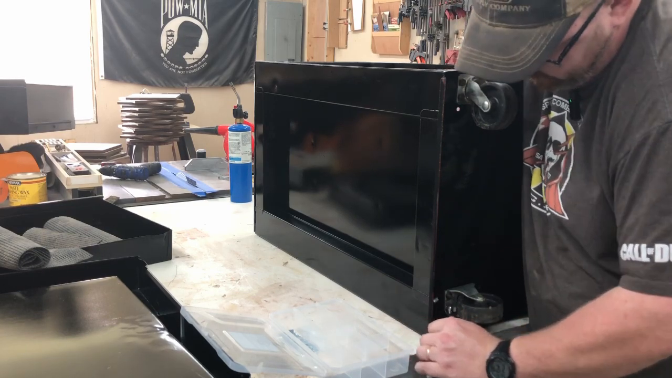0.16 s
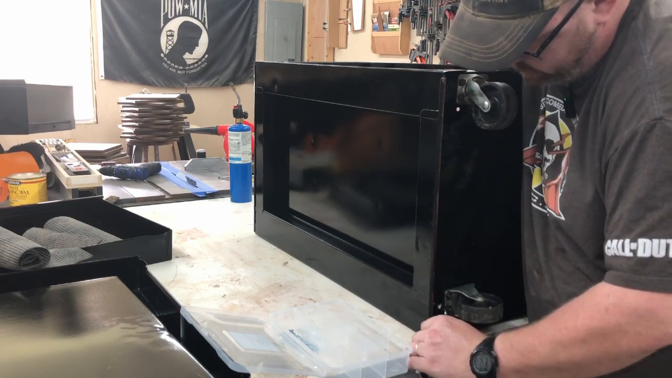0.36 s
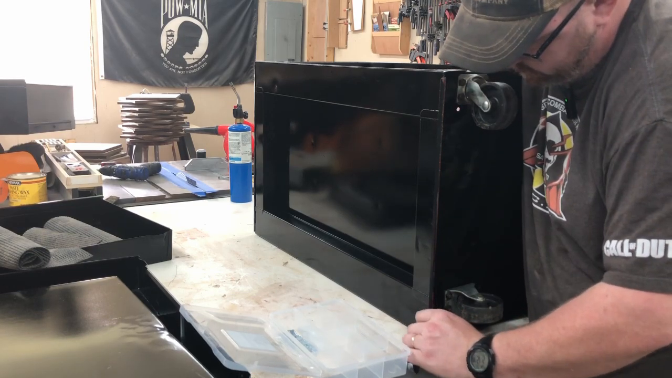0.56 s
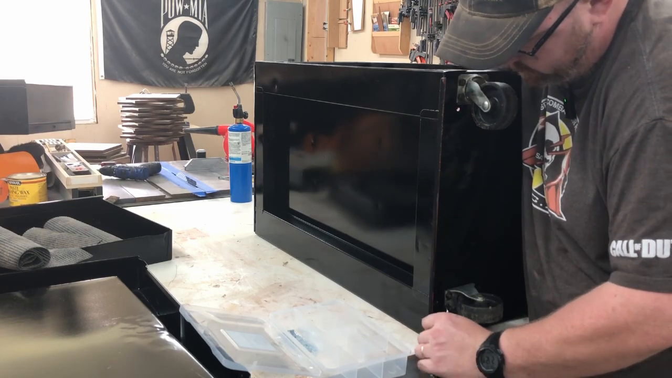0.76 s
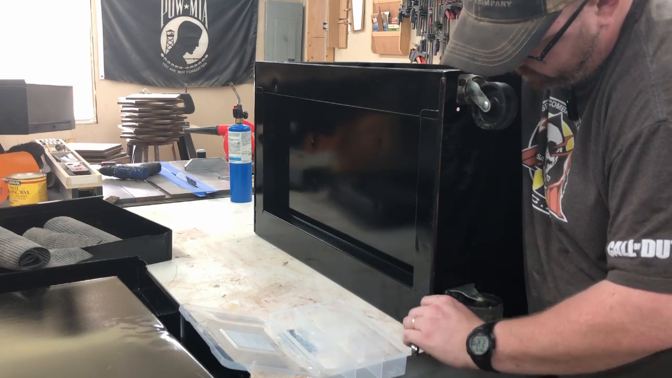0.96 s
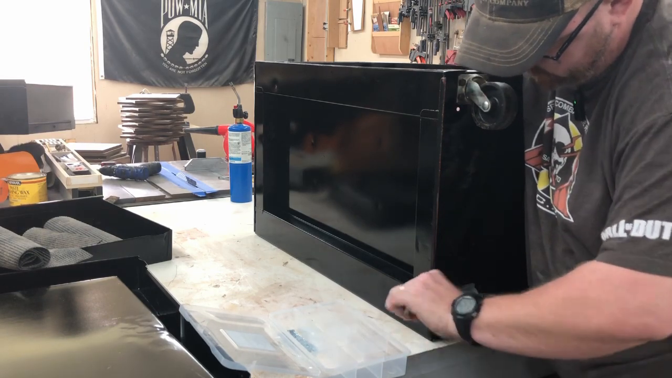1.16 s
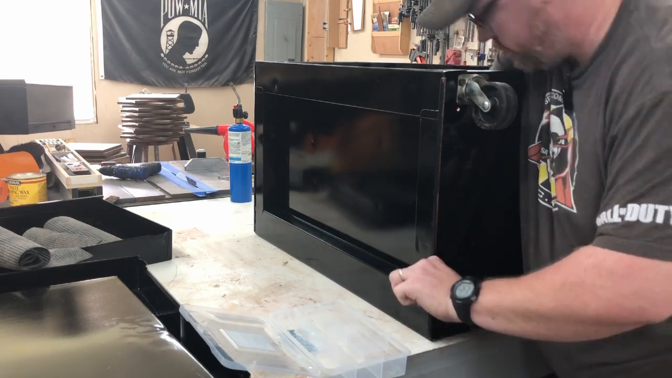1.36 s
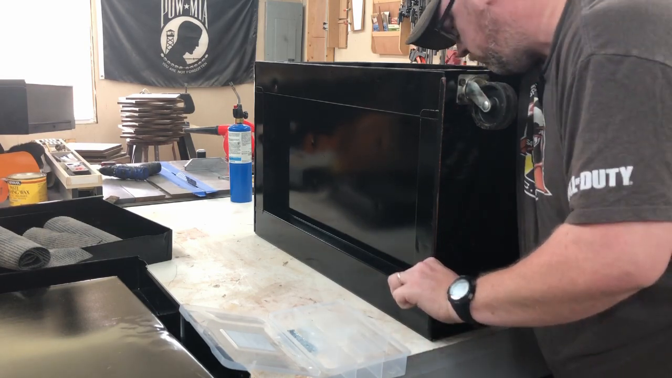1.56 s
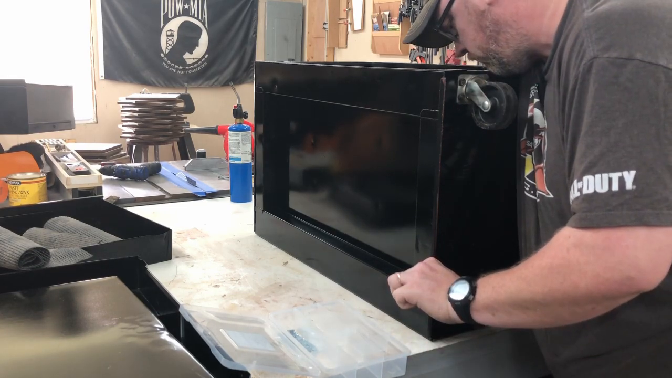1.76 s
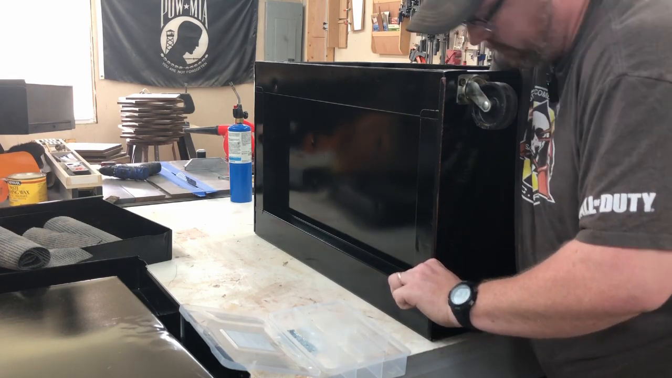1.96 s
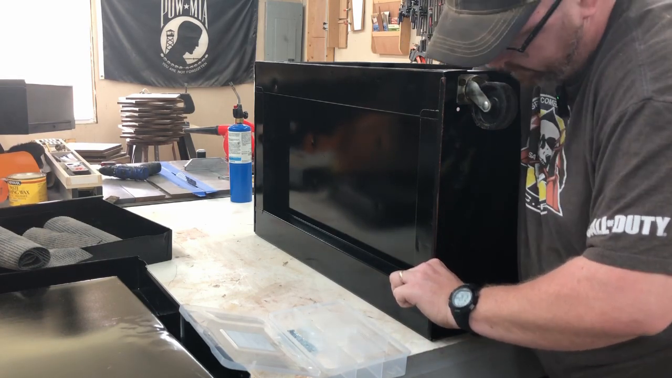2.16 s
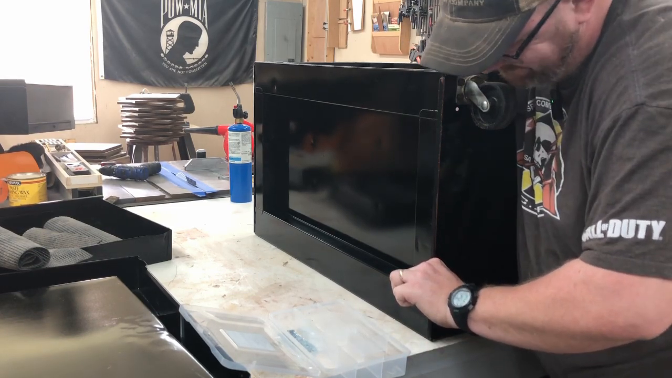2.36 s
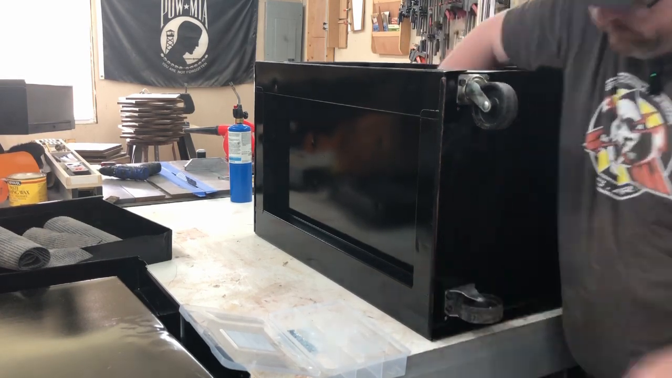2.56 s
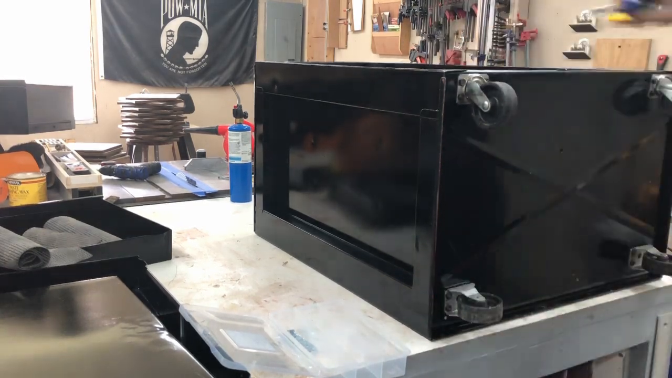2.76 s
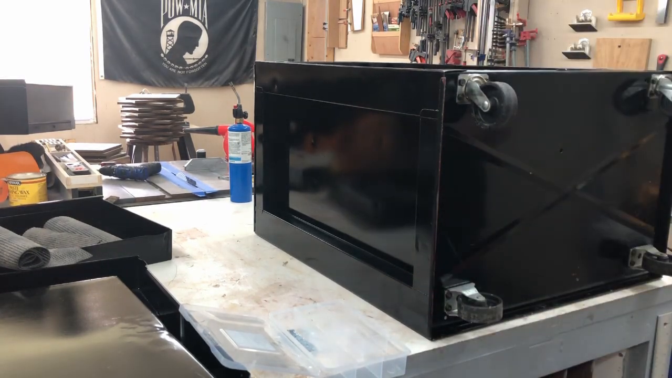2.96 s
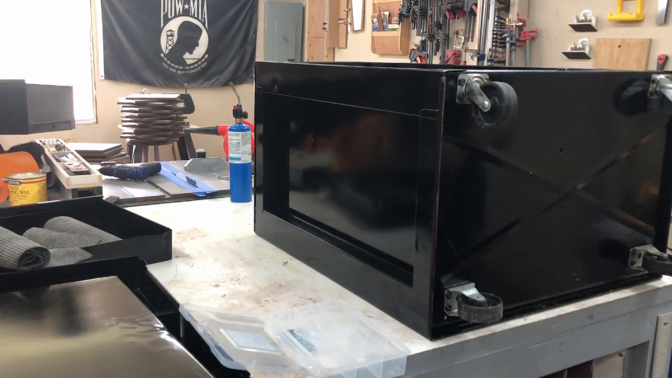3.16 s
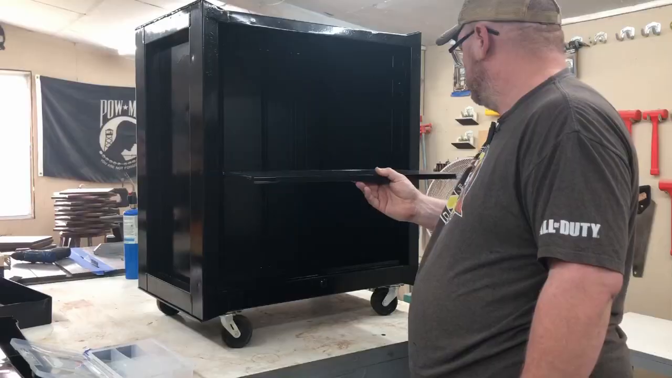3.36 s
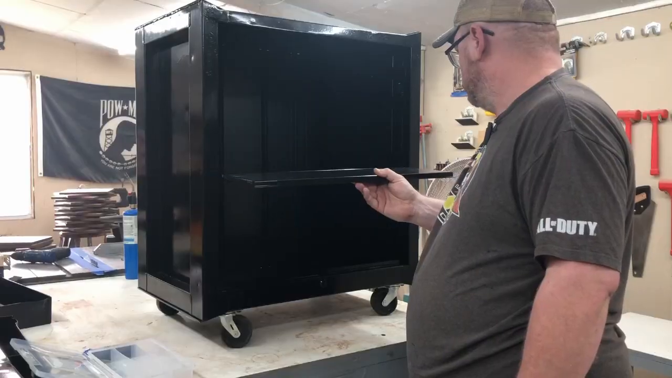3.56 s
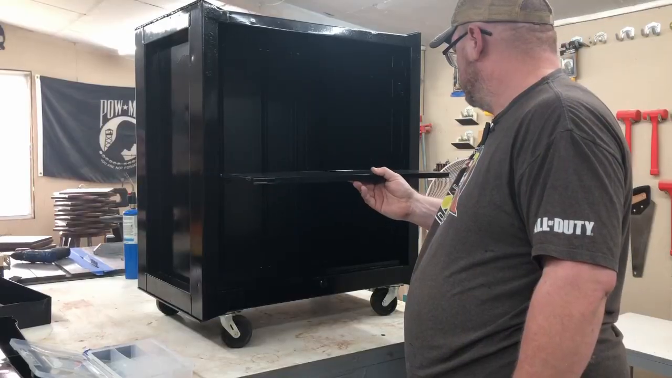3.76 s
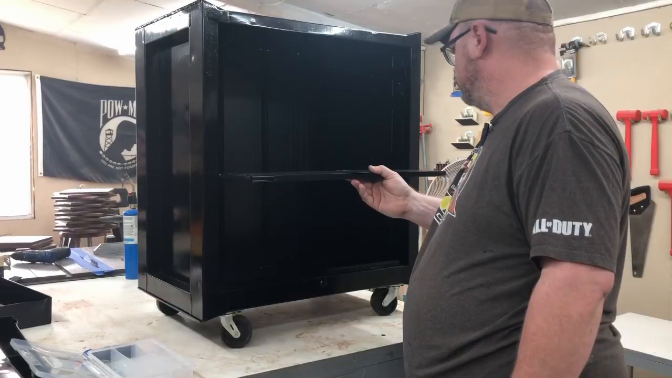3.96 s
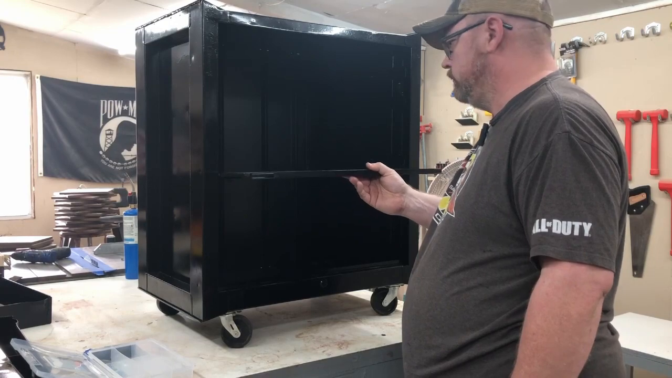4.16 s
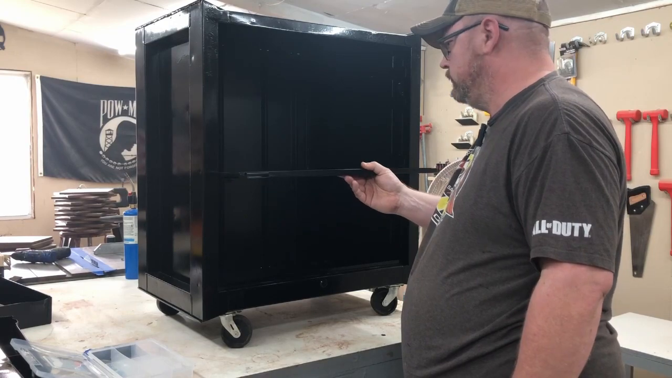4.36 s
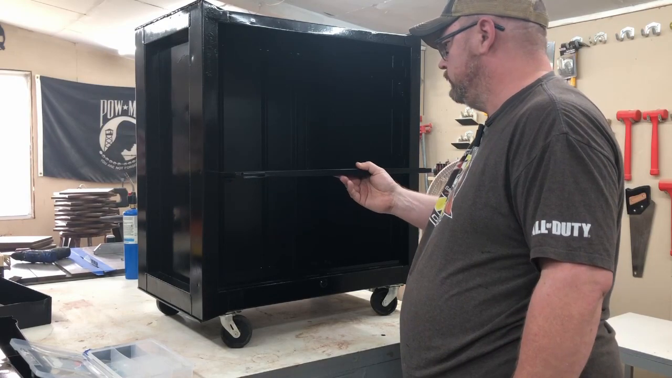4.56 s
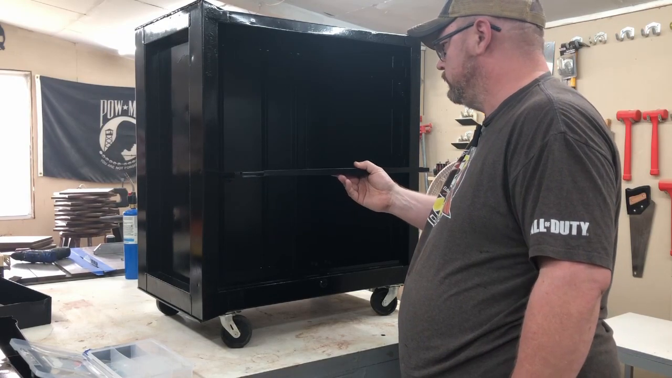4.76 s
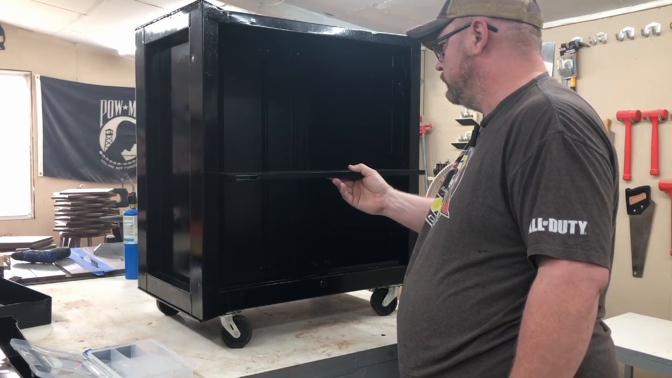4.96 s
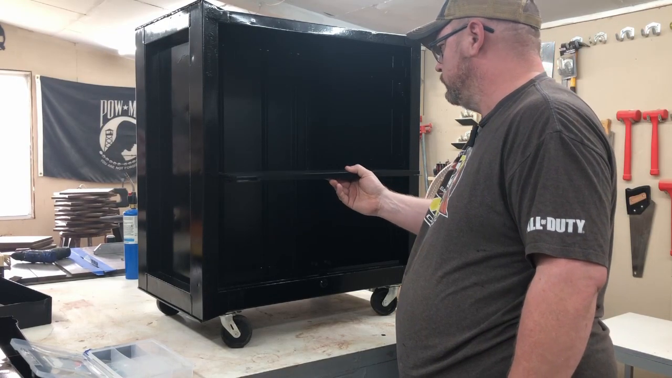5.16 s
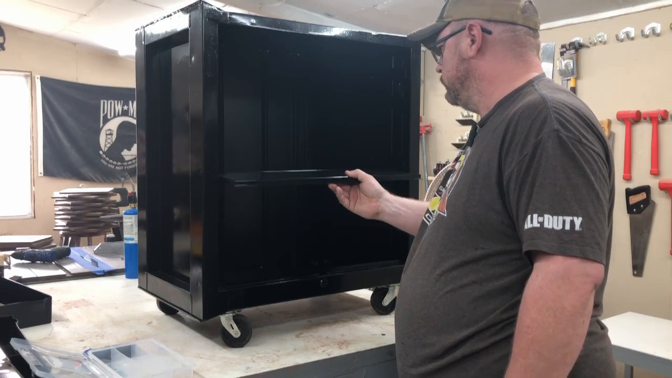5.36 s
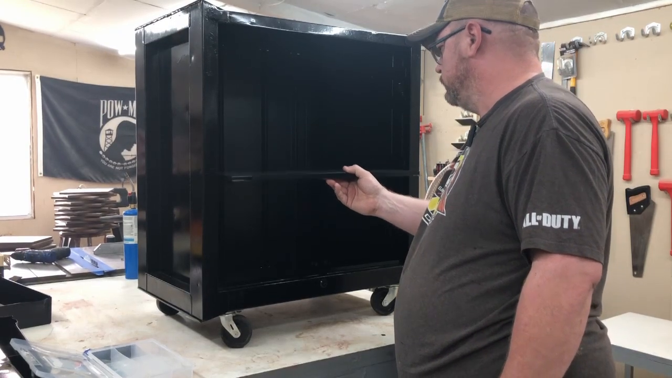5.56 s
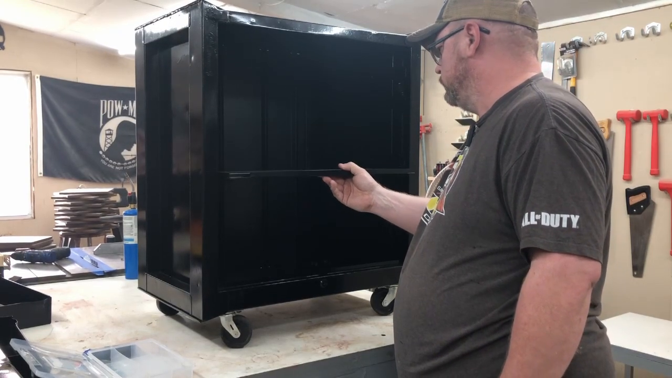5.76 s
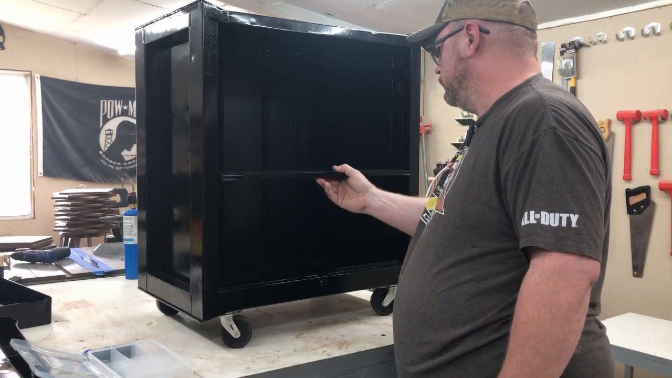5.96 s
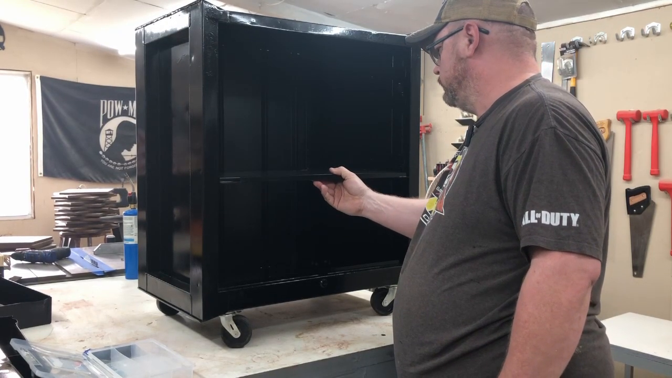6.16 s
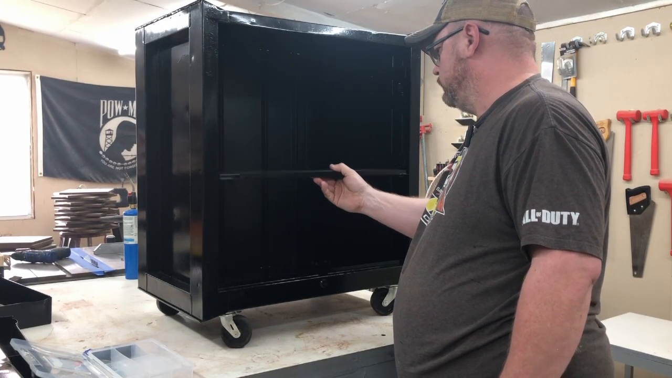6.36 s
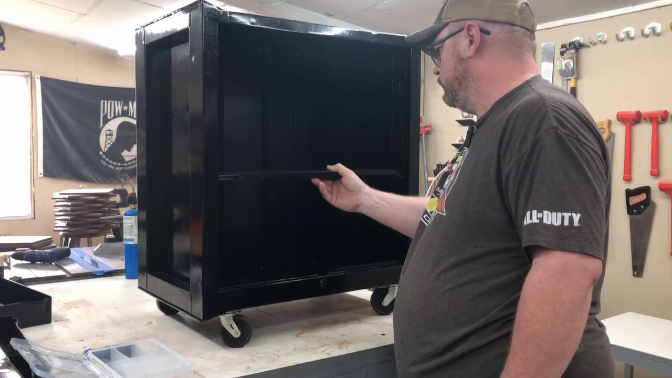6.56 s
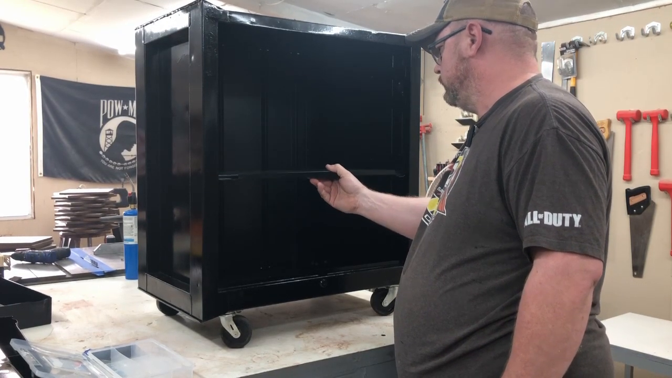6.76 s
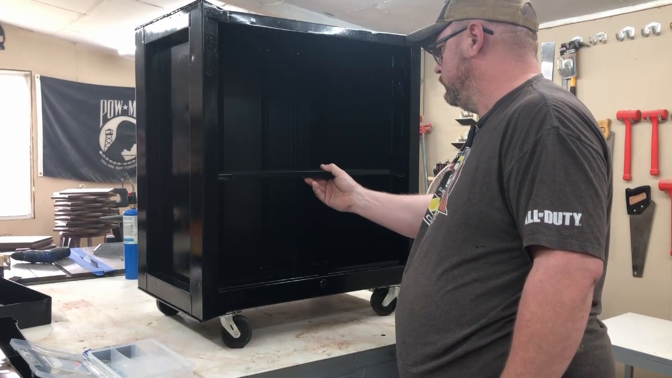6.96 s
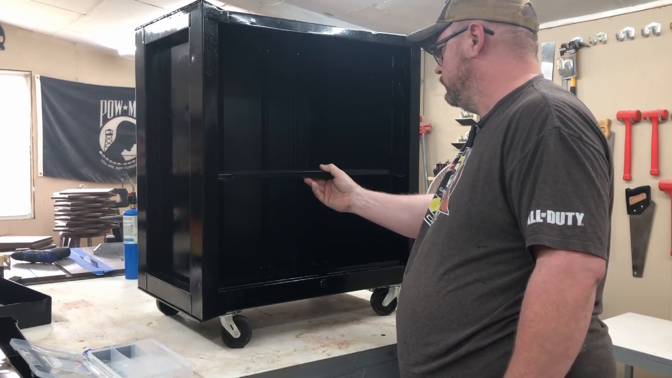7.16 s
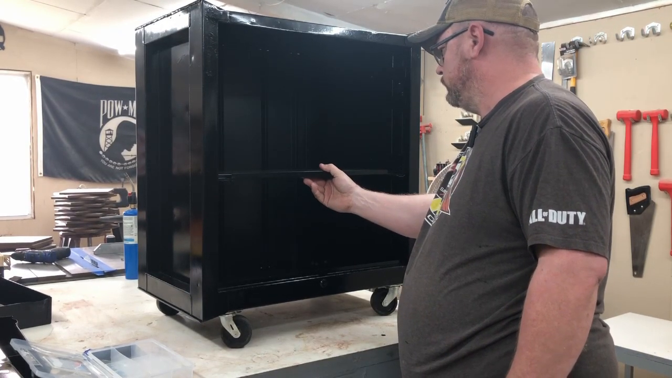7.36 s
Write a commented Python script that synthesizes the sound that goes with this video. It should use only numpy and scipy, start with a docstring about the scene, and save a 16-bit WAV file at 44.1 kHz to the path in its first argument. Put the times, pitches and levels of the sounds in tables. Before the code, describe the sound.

Left channel only, close and dry in a quiet workshop. A wrench on a caster bolt makes quick, thin clicks and clinks, densest around one second, then sparser ticks. After a near-silent gap and a tiny break in the room noise, a metal rail knocks and rattles in a hollow steel cabinet, with soft boomy bumps, faint rubbing notes, and several hard, bright clacks that ring briefly.

```python
"""A drawer slide is worked into a hollow sheet-steel cabinet in a woodshop, heard on the left channel only.
It rubs, knocks, rattles and latches: filtered impacts ring dense and single wall modes, friction holds notes.
Before it, a wrench clicks and clinks on a caster bolt, small, dry and thin: short bursts and brief steel modes.
Shaped noise makes a faint high hiss and the room noise, which breaks off briefly between the two jobs.
"""
import sys
import numpy as np
from scipy import signal
from scipy.fft import rfft, irfft, next_fast_len
from scipy.io import wavfile
from scipy.ndimage import uniform_filter1d

SR = 44100
rng = np.random.default_rng(int(sys.argv[2]) if len(sys.argv) > 2 else 0)


def master(y):
    """Save y as 16-bit WAV."""
    cut = np.clip(np.atleast_2d(y).T, -1, 1)
    pcm = np.round(cut * 32767)  # scale
    wavfile.write(sys.argv[1], SR, pcm.astype(np.int16))


N = 326340

GRID_HZ = np.geomspace(100, 16000, 90)  # frequencies at which blow spectra are computed
KNOCK_CORNER_HZ = 464  # the box booms fully below this


def slide_knocks():
    """The rail rattles home in a spray of small impacts; the box and the shop around it ring far longer."""
    # slide against cabinet: (time [s], contact [s], favoured wall mode [Hz], lift around it [dB],
    # level before colouring [dB], treble fall [dB per octave])
    knocks = [(3.543, 0.0092, 950, 11, 14.5, 9), (3.605, 0.028, 561.5, 9.5, 6.5, 10.5),
              (3.788, 0.0032, 827, 19, 5, 13), (3.938, 0.014, 430.7, 18.5, -18, 22),
              (4.697, 0.0066, 487, 2.5, -4.5, 11), (4.741, 0.015, 745, 19.5, 8, 12),
              (4.785, 0.013, 443, -2, 19, 25), (5.128, 0.0091, 391, -8, 15, 47),
              (5.263, 0.008, 490, -5.5, 17, 24.5), (5.34, 0.001, 444, 8, -24.5, -2.5),
              (5.394, 0.022, 2560, 3.5, 23, 3.5), (5.432, 0.09, 445, 5, 15.5, 4),
              (5.598, 0.0023, 419, 3, -34, 1), (5.856, 0.0053, 469, -1.5, 21, 26.5),
              (6.171, .01, 486, 3, 6, 11.5), (6.221, 0.0015, 522, 4, 22.5, 4.5),
              (6.244, 0.0047, 5300, -0.5, 24, 4.5), (6.266, 0.0032, 741, 4, 27.5, 7),
              (6.537, 0.04, 1420, 18.5, 17.5, 9), (6.547, 0.018, 3230, 5, 23.5, 5),
              (6.699, 0.0091, 433, 12.5, 19, 4), (7.056, 0.0097, 449.7, 1, 13, 17.5),
              (7.065, 0.1, 422, 6.5, -30.5, -4)]
    # resonances common to all knocks: (frequency [Hz], gain [dB])
    knock_body = [(60, -41), (150, -28.5), (200, -12.5), (250, -1.5), (450, -3.5), (850, 1), (1400, 0),
                  (2000, -0.5), (3200, 1.5), (4500, 6), (8500, 8), (12000, -3.5), (15500, -37)]
    # broad treble ringing of the thin rail: (frequency [Hz], gain [dB])
    rail_colour = [(3700, -2), (4600, -7), (5800, 0.5), (7100, -3.5), (8300, -2), (9800, -1), (11500, 5),
                   (14000, 19)]
    # cabinet walls and slide rail: (frequency [Hz], mean relative level [dB], t60 [s])
    cabinet_modes = [(244.5, -6, .26), (283.2, -1, 0.33), (384.3, -3.5, 0.22), (444, 4, 0.22),
                     (522, -2, 0.35), (614, -7.5, 0.35), (719, -3.5, .3), (827, 3, .28), (959, 0, 0.15),
                     (1044, -0.5, 0.27), (1300, 1.5, 0.17), (1436, 2, 0.2), (1710, 0.5, .28),
                     (1788, 3, 0.21), (2315, 2.5, 0.26), (2460, 4.5, 0.15), (2730, 3.5, 0.12),
                     (3080, 2.5, 0.22), (3260, 7, 0.18), (3440, 1.5, 0.12), (3774, 2, .24), (4380, 5, 0.16),
                     (4775, -0.5, 0.24), (5380, 0.5, 0.21), (6078, -1.5, 0.234)]
    # decay of the dense ring: (frequency [Hz], t60 [s])
    knock_decay = [(200, 0.38), (530, 0.37), (1400, 0.22), (3700, 0.19), (9700, 0.12)]
    out, t = np.zeros(N), np.arange(SR // 2) / SR
    for start_s, contact_s, wall_hz, lift_db, level_db, fall_db in knocks:
        spray = undb(-9) * bounces(t, 0.17)
        box = dense_ring(t, knock_decay)
        steel = undb(-24) * ring(t, cabinet_modes, scatter_db=3.0, detune=0.00049, split=.008)
        # the struck wall answers strongly at first, then rings on more quietly
        late_t60 = 0.42 * (KNOCK_CORNER_HZ / wall_hz) ** .5  # high modes die sooner
        wall = undb(-21.0) * ring(t, [(wall_hz, 2, .08), (wall_hz, -4, late_t60)], split=.015)
        vibration = even_out(spray + box, octaves=0.37) + steel + wall
        blow = unit(build_up(t, contact_s) * vibration)
        strength = knock_strength(wall_hz, lift_db, level_db, fall_db)
        add(out, start_s, colour(blow, knock_body, rail_colour, strength))
    return out


def knock_strength(mode_hz, lift_db, level_db, fall_db, most_loss_db=62):
    """(Hz, dB) of one knock: a full boom, and treble that falls the faster the softer the blow."""
    # only hard knocks set the rail sizzling; the treble steps down between these edges: [Hz]
    sizzle_edges_hz = [2820, 3980]
    # the step is 8.5 dB at a fall of 4.44 dB per octave and grows with the square of the fall
    sizzle_loss_db = 8.5 * (fall_db / 4.44) ** 2
    step_db = np.interp(GRID_HZ, sizzle_edges_hz, [0, sizzle_loss_db])
    octaves = np.maximum(np.log2(GRID_HZ / KNOCK_CORNER_HZ), 0)
    loss_db = np.minimum(fall_db * octaves + step_db, most_loss_db)
    gain_db = level_db - loss_db + favour(mode_hz, lift_db, octaves=0.56)
    return list(zip(GRID_HZ, gain_db))


def wall_bonks():
    """A steel wall flexes under the rail: a few clean cycles swell into one note and fade."""
    # (time [s], length [s], frequency [Hz], peak level [dB])
    bonks = [(3.538, 0.022, 816, -27), (3.779, 0.032, 828, -23), (4.735, 0.016, 823, -16),
             (4.792, 0.018, 462, -20.5), (5.402, 0.055, 449, -18.5), (5.46, 0.067, 444, -24),
             (5.851, 0.017, 450, -20)]
    out = np.zeros(N)
    for start_s, length_s, hz, peak_db in bonks:
        t = np.arange(int(length_s * SR)) / SR
        add(out, start_s, undb(peak_db) * np.hanning(len(t)) * np.sin(2 * np.pi * hz * t))
    return out


def rattles(rise_s=0.0044):
    """Loose steel chatters on; its micro-impacts feed one broad resonance."""
    # (time [s], centre [Hz], width [Hz], t60 of the impacts [s], energy [dB])
    chatters = [(2.787, 2240, 300, .07, -28), (2.799, 2830, 350, .08, -26), (2.817, 3200, 250, .046, -27),
                (3.537, 2900, 450, .19, -18), (3.539, 1600, 400, .14, -13), (3.54, 2630, 385, .095, -13.5),
                (3.616, 1640, 130, .15, -14), (3.62, 2800, 350, .1, -23), (4.734, 2530, 450, .2, -29),
                (4.736, 1800, 150, .15, -18.5), (4.738, 1320, 150, .19, -19), (4.76, 800, 350, .25, -5),
                (5.39, 3300, 250, .14, -2.5), (5.398, 8250, 450, .11, 3), (5.403, 11430, 2800, .11, 1.5),
                (5.408, 2450, 450, .2, 3.5), (5.408, 1826, 150, .27, -2), (5.447, 3220, 700, .12, -3.5),
                (6.272, 3320, 400, .12, -3), (6.29, 5560, 450, .32, -11), (6.555, 3350, 400, .29, 0),
                (6.705, 1300, 300, .17, 0), (6.706, 820, 198, .24, 4), (6.73, 570, 200, .34, 4)]
    out, t = np.zeros(N), np.arange(SR // 3) / SR
    for start_s, hz, width_hz, t60, energy_db in chatters:
        chatter = build_up(t, rise_s) * impacts(t, t60)
        add(out, start_s, undb(energy_db) * unit(resonate(chatter, hz, width_hz)))
    return out


def slide_rubs(waver_share=0.016, grit_width=0.2, swell=0.59, flutter_db=2):
    """Friction holds one rail resonance singing on a slightly wavering note, with grit around it."""
    # (time [s], length [s], frequency [Hz], rms level [dB], grit relative to the note [dB])
    rubs = [(4.675, 0.089, 496, -51, -8.5), (4.732, 0.033, 5350, -77.5, 2), (4.838, 0.098, 603, -46, -9.5),
            (4.906, .17, 1710, -59.5, -9.5), (4.923, 0.11, 1330, -58.5, 8), (4.98, 0.17, 824, -51, -11),
            (5.143, 0.12, 1400, -56, -6.5), (5.19, .17, 523, -47, -1), (5.23, .06, 5400, -76.5, 0),
            (5.719, .14, 1230, -62, -4), (6.001, 0.28, 1775, -60, -6.5), (6.116, 0.27, 481, -40, -3),
            (6.171, 0.059, 1400, -46.5, -10), (6.311, .19, 595.4, -43, -11.5),
            (6.796, 0.19, 612, -51.5, -5), (6.932, 0.051, 1410, -52.5, -12),
            (7.026, 0.085, 1400, -49.5, -12), (7.066, 0.073, 1717, -57, -11)]
    out = np.zeros(N)
    for start_s, length_s, hz, rms_db, grit_db in rubs:
        size = int(length_s * SR)
        # the hand's pressure sways both pitch and level
        pressure = uniform_filter1d(rng.standard_normal(SR // 2), size=900)[:size]
        pressure = (pressure - pressure.mean()) / pressure.std()
        phase = 2 * np.pi * np.cumsum(hz * (1 + waver_share * pressure)) / SR
        song = undb(flutter_db * pressure) * np.sin(phase)
        grit = resonate(rng.standard_normal(SR // 2), hz, hz * grit_width)[:size]
        stroke = signal.windows.tukey(size, swell)
        rub = unit((unit(song) + undb(grit_db) * unit(grit)) * stroke)
        add(out, start_s, undb(rms_db) * np.sqrt(size) * rub)
    return out


def wrench():
    """Hard steel contacts: a snap, a burst of chatter, then the short ring of tool, bracket and panel."""
    # wrench on caster bracket: (time [s], contact [s], favoured mode [Hz], lift around it [dB],
    # level before colouring [dB], loss to a soft contact [dB], bracket clink [dB])
    clicks = [(0.0791, 0.0011, 10130, 8, -13.5, 18.5, -12), (0.137, 0.0, 10590, 23.5, -20.5, 14, -13),
              (0.2075, 0.0019, 3200, 14, -10, 17, -26), (0.318, 0.0013, 4110, 13, -21, 14, 3.5),
              (0.3468, 0.0024, 15070, 20.5, -19.5, 9, -6), (0.4165, 0.00095, 1660, 11, -9.5, -2.5, 9),
              (0.438, 0.0, 1700, 9, -11, 3, 13), (0.52, 0.015, 1380, 8, -8, 5, 6),
              (0.5295, 0.00099, 1560, 11, 0, 2, 3.0), (0.5335, 0.003, 1470, 15, 0, 14, 3),
              (0.6127, 0.0067, 1540, 16.5, -10, 3.5, 6), (0.6225, 0.0028, 1330, 13.5, -6, 9.5, 12.5),
              (0.6389, 0, 1220, 8, -10.0, -7.5, -8), (0.6857, 0.00067, 1530, 1, -16.5, 12, -13),
              (0.736, 0.018, 1880, 13, -1, 12, 1), (0.745, 0.00062, 1510, -4, 4, 10.5, 7),
              (0.7511, 0.0025, 1610, 4, 4, 5.5, 4), (0.7697, 0.0014, 1310, 4.5, -2, 5, -11),
              (0.7963, 0.00045, 1980, 4, -4, 4.5, 4.5), (0.8281, 0, 4970, 7, -37, -10.5, 4),
              (0.867, 0.0071, 2630, 12.5, -6.5, 9, 6.5), (0.8779, 0.0, 1560, 8.5, -1.5, 4.5, 10.5),
              (0.911, 0.0018, 1300, 0, 7.5, 10.5, -7), (0.9189, 0.00024, 1340, 5.5, 4.5, 7.5, 0.5),
              (0.9481, 0.0, 2440, 3, -9.5, -0.5, 6.5), (0.967, 0.0, 1560, 4, -5, 12, 0.5),
              (0.9701, 0.0, 1830, 7, 1, 2.5, 0.5), (0.987, 0, 1512, 7, -3, 11.5, 6.5),
              (1.0335, 0, 2300, 3, -1.5, 16.5, -1), (1.0349, 0.00091, 2730, 17.5, 14, 17, 12),
              (1.0424, 0.0013, 3330, 18, 0, 5, 7), (1.1158, 0.0009, 2220, 30, -24, 17, 4),
              (1.1493, 0.0, 1440, 3.5, 1, 5, 2), (1.247, 0.0011, 4860, 9, -30.5, 5.5, 0),
              (1.2834, 0.00029, 2130, 6.5, 1, 8.5, 0.5), (1.5601, 0, 2750, 1, 24, 40.5, 10),
              (1.6685, 0.00052, 1220, 11.5, 5, 70, -4), (1.715, 0, 2910, 3, -5.5, 3.5, -3),
              (1.7205, 0, 2970, 4.5, -4.5, 1, -9), (1.7925, 0.0022, 1580, -0.5, 17.5, 26.5, 4),
              (1.814, 0.0058, 4400, 6, 4.5, 17, -1), (1.8228, 0.0, 1070, 4, 17, 28.5, 7.5),
              (1.8977, 0.0, 1013, 8.5, 23.5, 28.5, -1.5), (1.9505, 0, 6330, 9, -15.5, 14, -7),
              (1.9975, 0.0025, 2350, 2, 24.5, 31, 5.5), (2.147, 0.0018, 1160, 5.5, 2, 18, 3),
              (2.2346, 0.014, 2300, 4, -9.5, 41, -0.5), (2.2595, 0.0023, 1050, 14, -11.5, 33, 2),
              (2.3136, 0.017, 3240, 15, -4.5, 44, -6), (2.4676, 0.0044, 1150, 4.5, 12.5, 35, -25),
              (2.4888, 0, 1640, 15.5, 10.5, 72, -0.0), (2.527, 0.006, 9000, 6, -28, 0.5, -6),
              (2.799, 0.0094, 860, 25, -10, 23, 0)]
    # resonances common to all clicks: (frequency [Hz], gain [dB])
    click_body = [(100, -19), (620, -16), (800, -16.5), (950, -5), (1080, -1), (1450, 2.5), (1850, 2),
                  (2300, -3), (3000, -4), (3700, -1), (4200, 7.5), (4900, 7), (5600, 4.5), (7200, 1.5),
                  (9500, 5), (12000, -3), (16000, -11)]
    # wrench and caster steel: (frequency [Hz], mean relative level [dB], t60 [s])
    wrench_modes = [(1440, -2, .08), (1782, -1.5, 0.051), (2070, -6.5, .05), (2380, -2, .05),
                    (3010, -2.5, 0.093), (3330, -1.5, .06), (4150, -0.5, 0.035), (4530, -7, 0.061),
                    (4720, -1.5, .04), (4980, 2.5, .04), (5800, 5, .035), (7820, -0.5, 0.043)]
    # bottom panel, ringing on quietly: (frequency [Hz], mean relative level [dB], t60 [s])
    panel_modes = [(1110, -31, 0.16), (1155, -30, .1), (1254, -27.5, .11), (1400, -32, 0.1),
                   (1560, -30, .09)]
    # decay of the dense ring: (frequency [Hz], t60 [s])
    click_decay = [(500, 0.094), (1200, 0.07), (2500, 0.064), (5500, 0.04), (13000, 0.062)]
    out, t = np.zeros(N), np.arange(SR // 5) / SR
    for start_s, contact_s, mode_hz, lift_db, level_db, loss_db, bracket_db in clicks:
        snap = undb(-6) * (t == 0)
        chatter = undb(1.5) * impacts(t, 0.01342)
        tail = undb(-6) * dense_ring(t, click_decay)
        steel = undb(-24.5) * ring(t, wrench_modes, scatter_db=4.5, detune=.006, split=0.0067)
        panel = ring(t, panel_modes, scatter_db=2, detune=.011, split=.03)
        # a long contact loses the snap and becomes a scuff
        blow = even_out(build_up(t, contact_s) * (snap + chatter + tail + steel + panel))
        strength = click_strength(mode_hz, lift_db, level_db, loss_db, bracket_db)
        add(out, start_s, colour(blow, click_body, strength))
    return out


def click_strength(mode_hz, lift_db, level_db, loss_db, bracket_db, bracket_hz=4450, bracket_oct=.2):
    """(Hz, dB) of one click: a hard blow, less what a soft contact takes away, plus the bracket's clink."""
    # a soft contact still rings the panel but loses snap and thump: (frequency [Hz], share of the loss [1])
    soft_share = [(250, 0.968), (640, 0.43), (1050, 0.044), (1450, 0.26), (2000, .2), (3000, 0.33),
                  (4500, 0.76), (5600, 0.96), (7200, 1.165), (13000, 1.04)]
    lifts_db = favour(mode_hz, lift_db, octaves=0.21) + favour(bracket_hz, bracket_db, bracket_oct)
    gain_db = level_db - loss_db * along(GRID_HZ, soft_share) + lifts_db
    return list(zip(GRID_HZ, gain_db))


def thumps():
    """Wrench and hand jolt the bench: a short, dead thud, a coloured impulse mostly under a hard click."""
    # (time [s], energy [dB])
    jolts = [(.349, -36.5), (.418, -32), (.5305, -22), (.639, -24), (.686, -34), (.747, -13.5), (.8, -15.5),
             (.879, -17), (.912, -17.5), (.967, -24), (1.148, -16.5), (2.147, -33), (2.486, -34.5),
             (2.628, -41)]
    # (frequency [Hz], relative level [dB])
    thump_colour = [(100, -0.5), (300, 0.5), (650, -1), (1200, -10), (3000, -11.5)]
    out, t = np.zeros(N), np.arange(SR // 20) / SR
    impulse = 1. * (t == 0)
    for start_s, energy_db in jolts:
        add(out, start_s, undb(energy_db) * unit(colour(impulse, thump_colour)))
    return out


def hiss():
    """A faint band of high noise, mostly 8 to 14 kHz, swells and fades."""
    # (time [s], rms level [dB])
    hiss_level = [(3.899, -93), (3.961, -78), (4.1, -74), (4.25, -60), (4.331, -77), (4.7, -82),
                  (4.798, -78)]
    # (frequency [Hz], relative level [dB])
    hiss_colour = [(4000, -26), (7000, -15), (8400, -8), (9500, -14.5), (10600, -1.5), (12800, 5),
                   (14300, -12), (15800, -20)]
    t, (time_s, rms_db) = np.arange(N) / SR, np.transpose(hiss_level)
    active = (t > time_s[0]) & (t < time_s[-1])
    return air(hiss_colour, np.interp(t, time_s, rms_db)) * active


def room_noise(thin_end_s=3.338, full_start_s=3.358):
    """Faint steady noise, thin under the wrench and fuller under the slide, silent for 20 ms between."""
    # under the wrench: (frequency [Hz], relative density [dB])
    thin_air = [(100, -20), (600, -17), (750, -19.5), (900, 2.5), (1100, 1.5), (1450, 7.5), (1800, 4),
                (2400, 3.5), (4200, 2.5), (6500, -4), (11000, -12.5), (13500, -8.5), (15500, -20)]
    # under the slide: (frequency [Hz], relative density [dB])
    full_air = [(100, -27.5), (150, -20.5), (200, -4), (260, 7), (420, 9.5), (800, 7), (1450, 7),
                (2400, -3), (3300, -3.5), (4300, -17.5), (6500, -21.5), (12500, -20), (14000, -22.5),
                (15500, -30.5)]
    t = np.arange(N) / SR
    thin = air(thin_air, rms_db=-60.5) * (t < thin_end_s)
    full = air(full_air, rms_db=-58.5) * (t > full_start_s)
    return thin + full


def air(spectrum, rms_db):
    """Noise of a given colour and rms level."""
    return undb(rms_db) * np.sqrt(N) * unit(colour(rng.standard_normal(N), spectrum))


def build_up(t, contact_s):
    """Vibration grows for as long as the parts scrape on each other."""
    return np.minimum((t + 1 / SR) / max(contact_s, 1 / SR), 1)


def impacts(t, t60):
    """A few sharp micro-impacts among many weak ones, dying away; unit energy."""
    grains = rng.standard_normal(len(t)) ** 3  # cubing makes the peaks sparse
    return unit(grains * fade(t, t60))


def bounces(t, t60, gap_s=0.013, count=9):
    """The rail hits and rebounds at uneven gaps, each time with a short crack; unit energy."""
    out = np.zeros(len(t))
    gaps_s = gap_s * (.5 + rng.random(count))
    hits_s = np.cumsum(gaps_s) - gaps_s[0]
    for hit_s, size in zip(hits_s, .5 + rng.random(count)):
        i = min(int(hit_s * SR), len(t) - 1)
        crack = impacts(t, 0.027)[:len(t) - i]
        out[i:] += size * fade(hit_s, t60) * crack
    return unit(out)


def dense_ring(t, decay, count=14):
    """Countless overlapping modes: bands of noise, each with its own decay; flat spectrum, unit energy."""
    noise = rfft(rng.standard_normal(len(t)))
    hz = np.arange(len(noise)) * SR / len(t)
    edges_hz = np.append(0, np.geomspace(300, SR / 2, count))
    out = 0
    for lo, hi in zip(edges_hz, edges_hz[1:]):
        band = irfft(noise * ((hz >= lo) & (hz < hi)), len(t))
        t60 = along((lo + hi) / 2, decay)
        out = out + unit(band * fade(t, t60)) * np.sqrt(hi - lo)
    return unit(out)


def ring(t, modes, scatter_db=0, detune=0, split=0, count=3):
    """Modes in close, beating groups; every point of contact weights and loads them a little differently."""
    # detune shifts a whole group and split spreads it, both as shares of its pitch
    out = 0
    for (hz, db, t60), (size, shift) in zip(modes, rng.standard_normal((len(modes), 2))):
        apart, phase = rng.standard_normal((2, count, 1))
        live = t[t < max(t60, .01) * 1.3]  # skip the inaudible end
        group_hz = hz * (1 + detune * shift + split * apart)
        wave = np.sin(2 * np.pi * (group_hz * live + phase)).sum(axis=0)
        mode = np.pad(unit(wave * fade(live, t60)), (0, len(t) - len(live)))
        out = out + undb(db + scatter_db * size) * mode
    return out


def favour(mode_hz, lift_db, octaves):
    """Lift in dB of the modes that lie near the one struck best."""
    return lift_db * np.exp(-.5 * (np.log2(GRID_HZ / mode_hz) / octaves) ** 2)


def even_out(x, octaves=0.53):
    """Flatten the smoothed spectrum, so that the given colour alone shapes the blow."""
    size = 4 * len(x)
    total = np.cumsum(np.abs(rfft(x, size)) ** 2)
    lo, hi = (np.clip(GRID_HZ * 2 ** (side * octaves), 0, SR / 2) * size / SR for side in (-.5, .5))
    bins = np.arange(len(total))
    power = (np.interp(hi, bins, total) - np.interp(lo, bins, total)) / (hi - lo)
    return colour(x, list(zip(GRID_HZ, -10 * np.log10(power + 1e-12))))


def resonate(x, hz, width_hz):
    """Band-pass around one resonance."""
    edges_hz = np.clip([hz - width_hz / 2, hz + width_hz / 2], 20, SR * .45)
    return signal.sosfilt(signal.butter(2, edges_hz, "band", fs=SR, output="sos"), x)


def colour(x, *spectra):
    """Causal minimum-phase filter with the summed (Hz, dB) spectra, so that attacks stay sharp."""
    size = 2 * next_fast_len(len(x))
    hz = np.arange(size // 2 + 1) * SR / size
    gain = undb(sum(along(hz, s) for s in spectra))
    # folding the cepstrum onto positive time gives minimum phase
    cepstrum = irfft(np.log(gain))
    cepstrum[1:size // 2] *= 2
    cepstrum[size // 2 + 1:] = 0
    return irfft(rfft(x, size) * np.exp(rfft(cepstrum)))[:len(x)]


def along(hz, points):
    """Read (Hz, value) points on a log-frequency axis."""
    f, value = np.transpose(points)
    return np.interp(np.log(np.maximum(hz, 1)), np.log(f), value)


def fade(t, t60):
    """Exponential decay, 60 dB in t60 seconds."""
    return np.exp(-np.log(1000) * t / t60)


def undb(db):
    """Decibels to gain."""
    return 10 ** (np.asarray(db) / 20)


def unit(x):
    """Scale to unit energy."""
    return x / np.sqrt(np.sum(x ** 2) + 1e-18)


def add(out, start_s, x):
    """Mix x in at start_s."""
    i = int(start_s * SR)
    out[i:i + len(x)] += x[:N - i]


def scene():
    """Slide and wrench over the room noise on the left; the right channel is silent."""
    slide = slide_knocks() + wall_bonks() + slide_rubs()
    left = slide + rattles() + wrench() + thumps() + hiss() + room_noise()
    return np.array([left, np.zeros(N)])


def record(dry):
    """A steep low-pass removes everything above 16 kHz."""
    return signal.sosfilt(signal.ellip(8, .2, 80, 16000, fs=SR, output="sos"), dry)


dry = scene()
out = record(dry)
master(out)
```